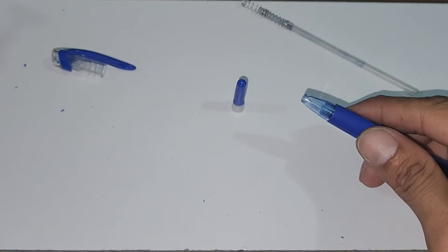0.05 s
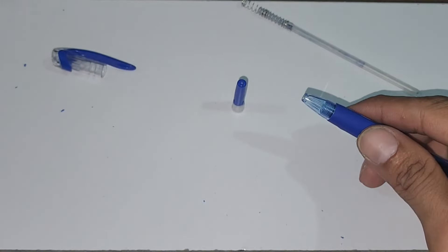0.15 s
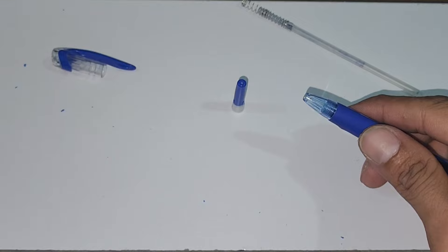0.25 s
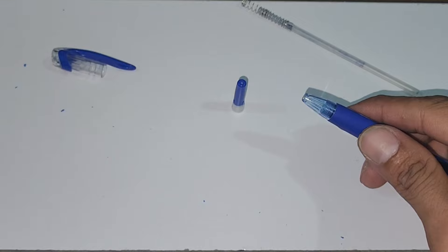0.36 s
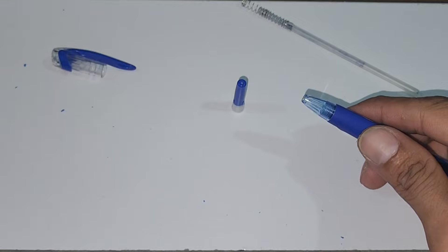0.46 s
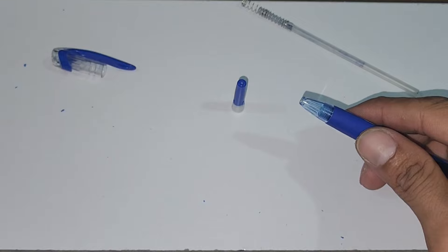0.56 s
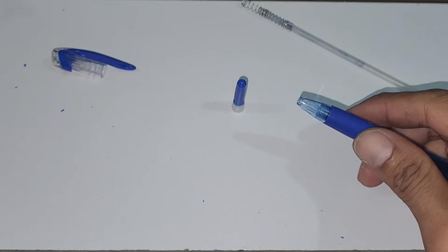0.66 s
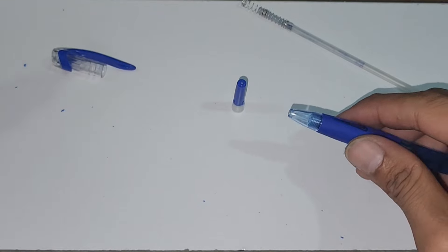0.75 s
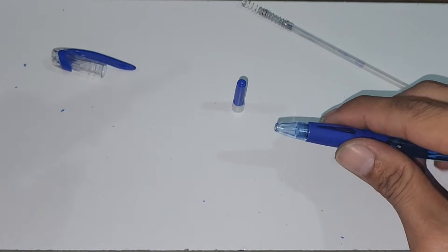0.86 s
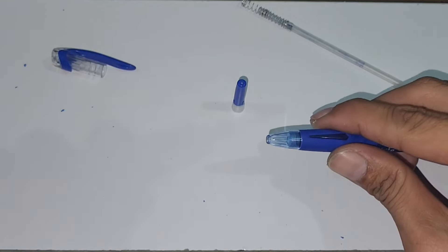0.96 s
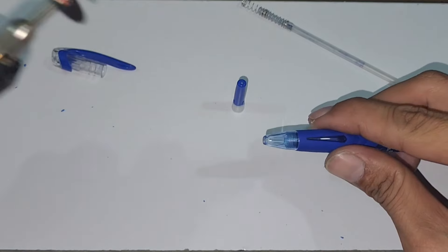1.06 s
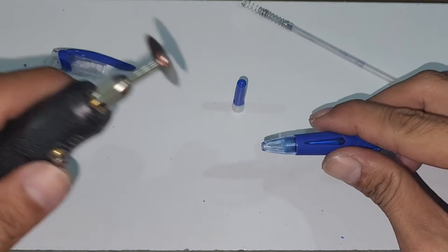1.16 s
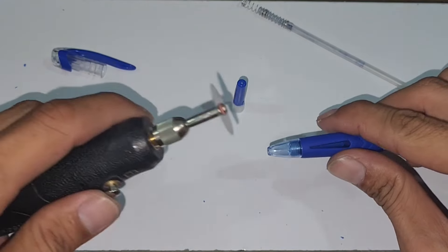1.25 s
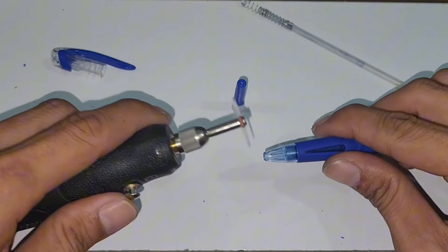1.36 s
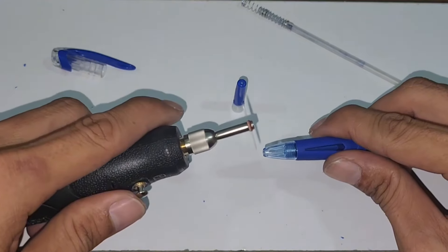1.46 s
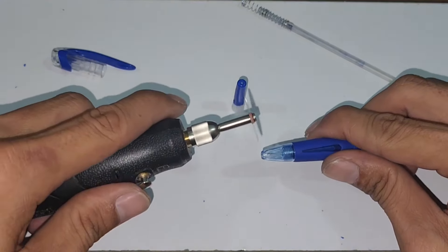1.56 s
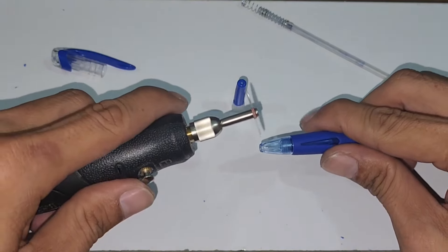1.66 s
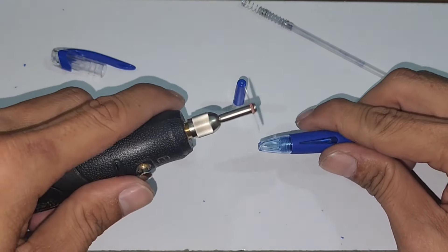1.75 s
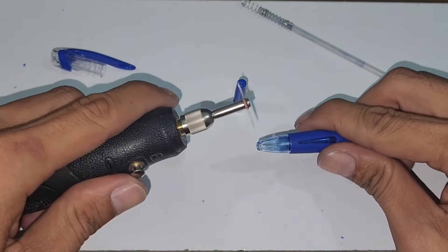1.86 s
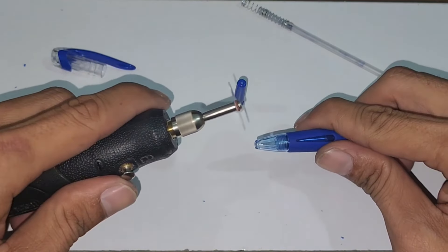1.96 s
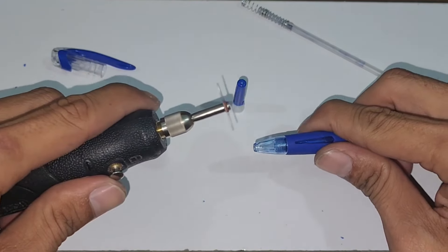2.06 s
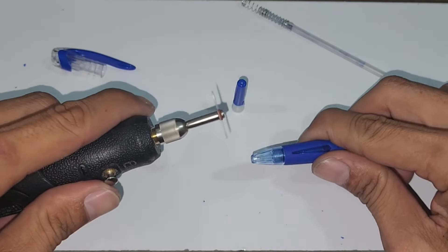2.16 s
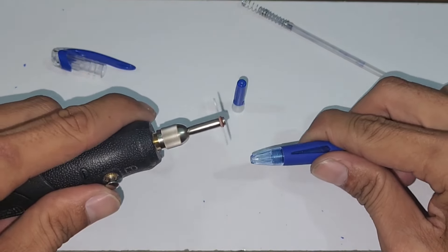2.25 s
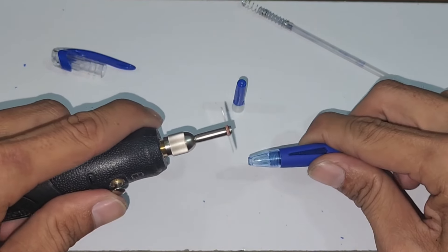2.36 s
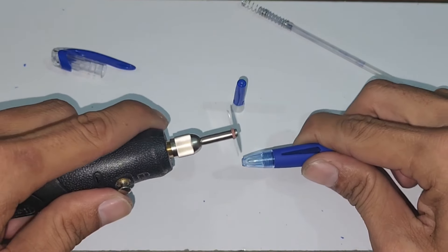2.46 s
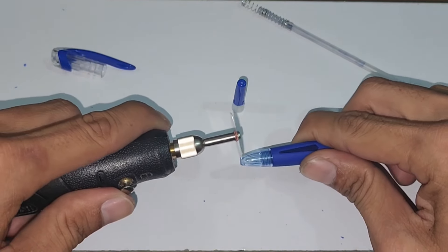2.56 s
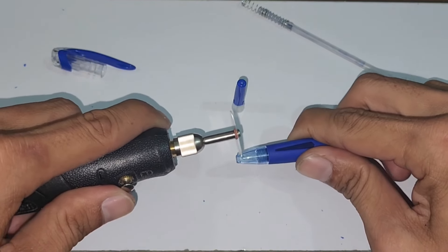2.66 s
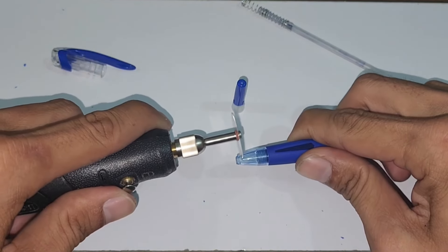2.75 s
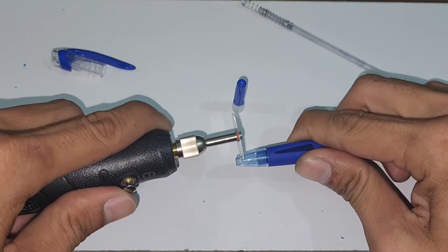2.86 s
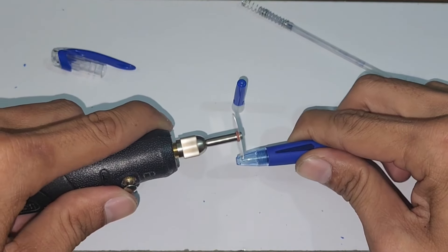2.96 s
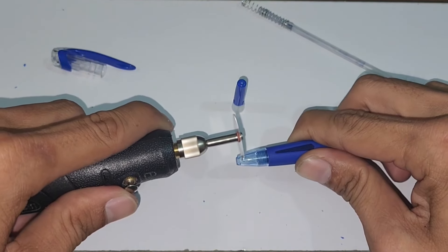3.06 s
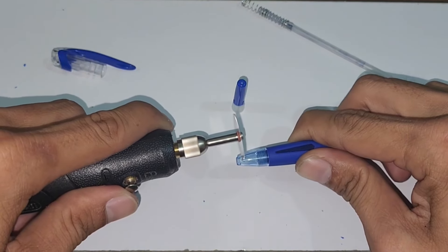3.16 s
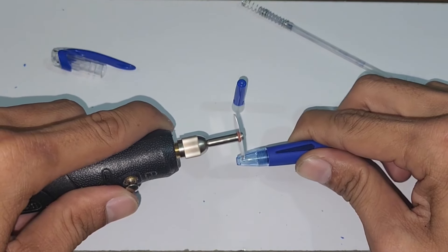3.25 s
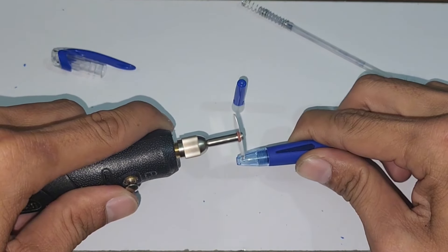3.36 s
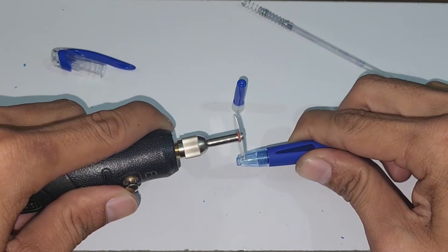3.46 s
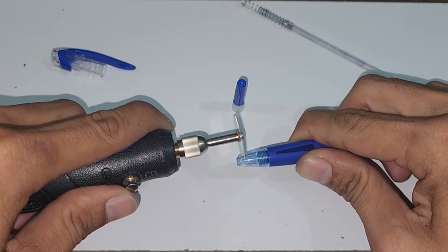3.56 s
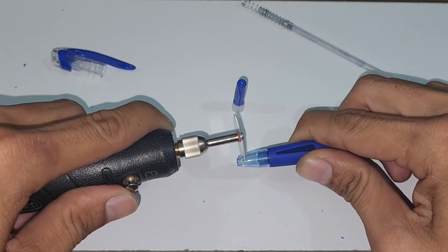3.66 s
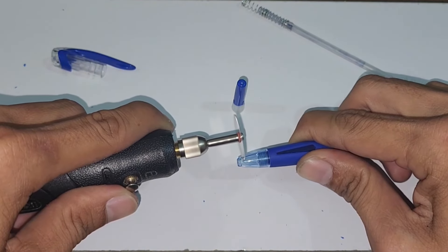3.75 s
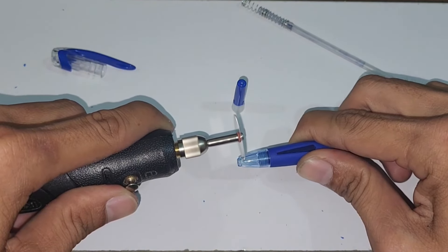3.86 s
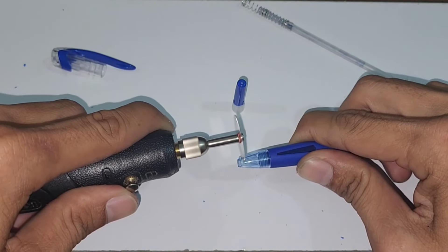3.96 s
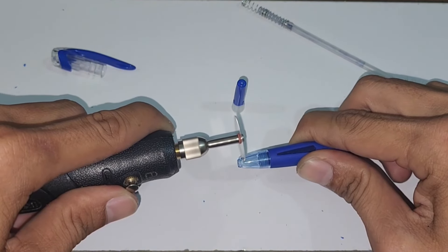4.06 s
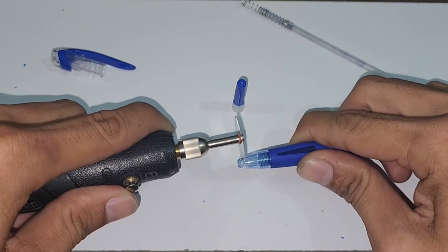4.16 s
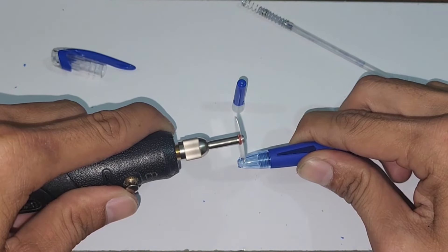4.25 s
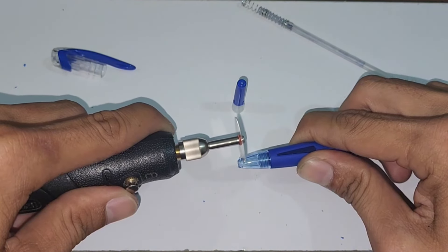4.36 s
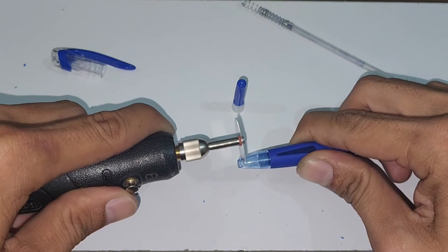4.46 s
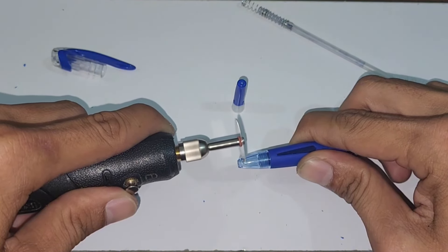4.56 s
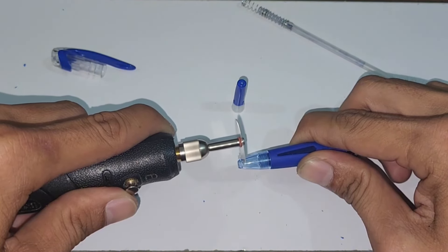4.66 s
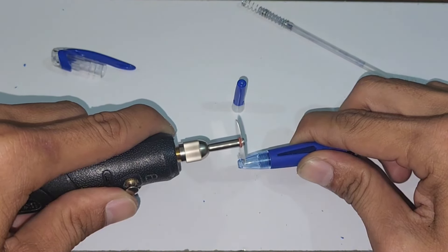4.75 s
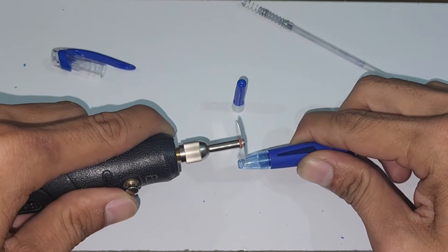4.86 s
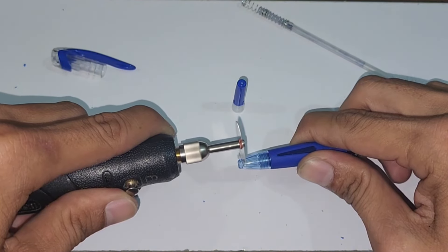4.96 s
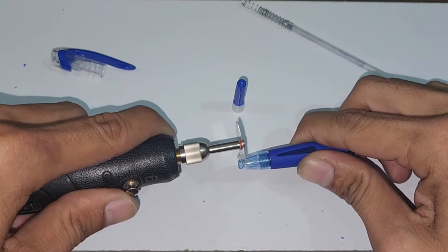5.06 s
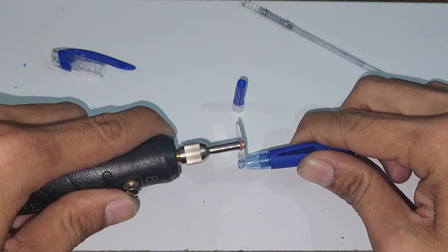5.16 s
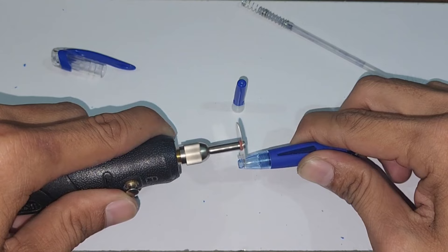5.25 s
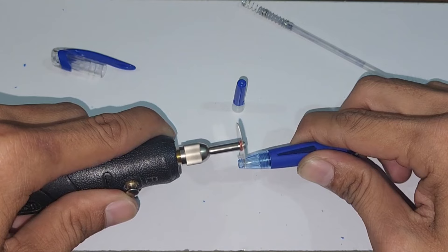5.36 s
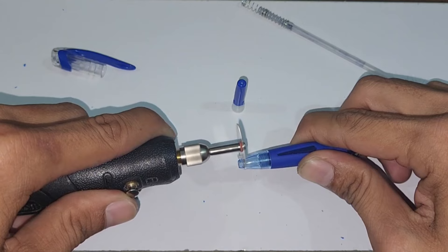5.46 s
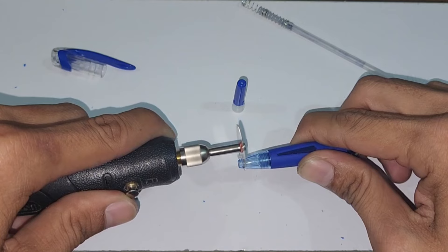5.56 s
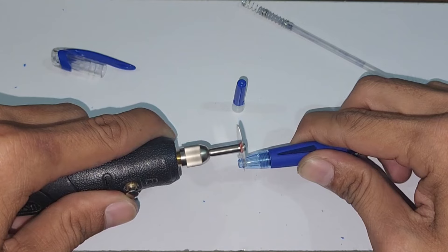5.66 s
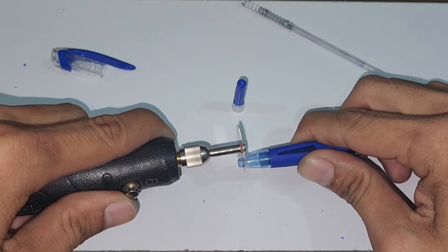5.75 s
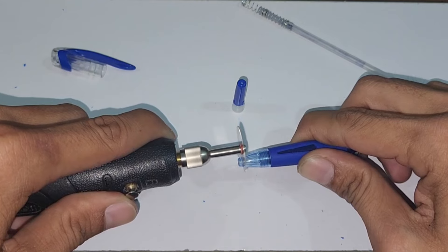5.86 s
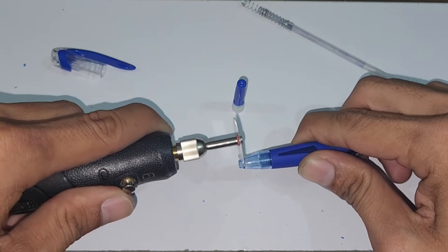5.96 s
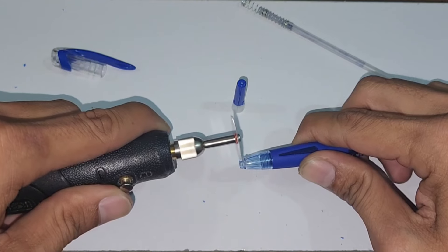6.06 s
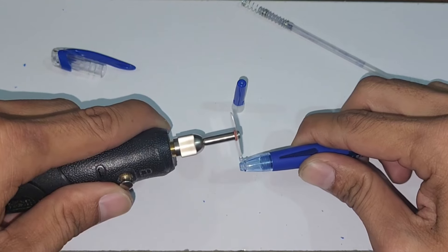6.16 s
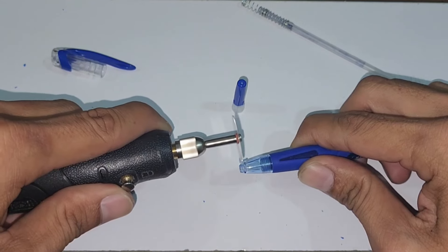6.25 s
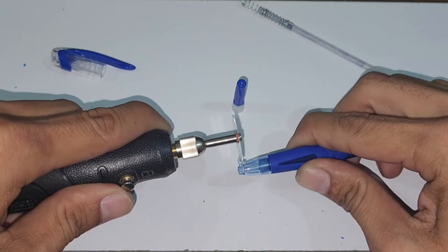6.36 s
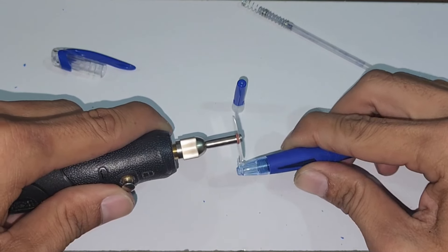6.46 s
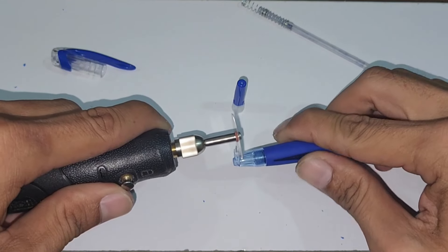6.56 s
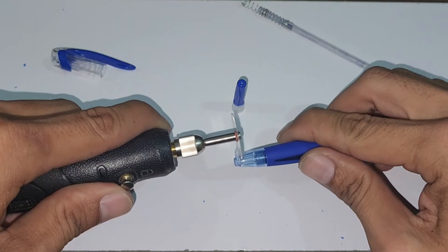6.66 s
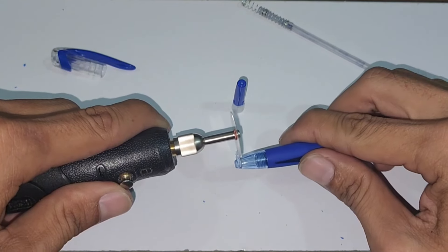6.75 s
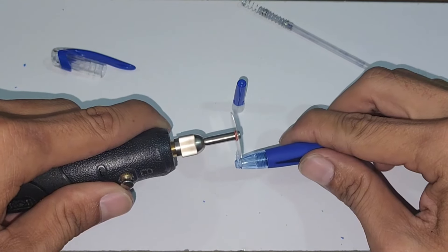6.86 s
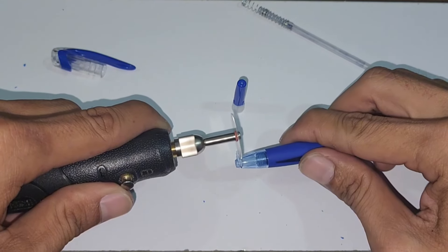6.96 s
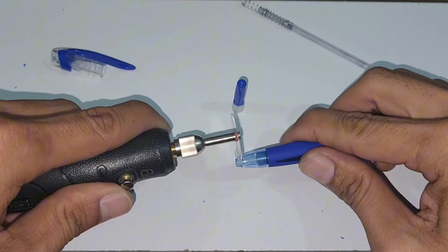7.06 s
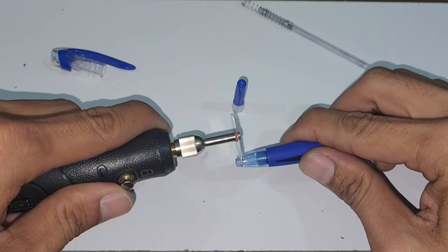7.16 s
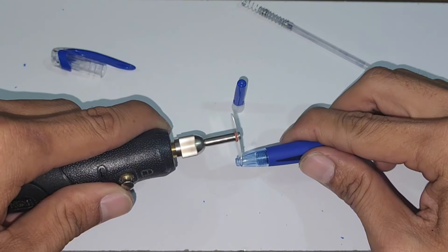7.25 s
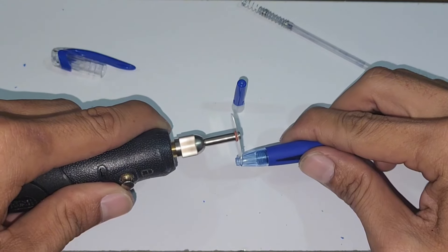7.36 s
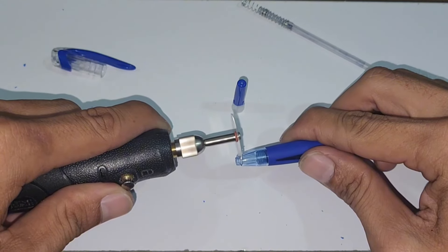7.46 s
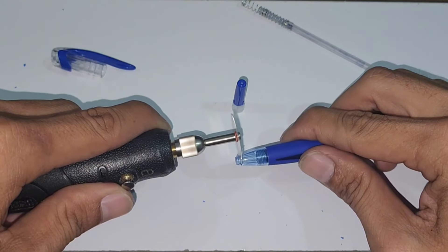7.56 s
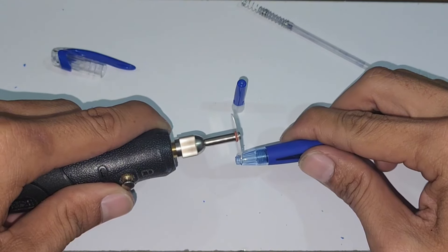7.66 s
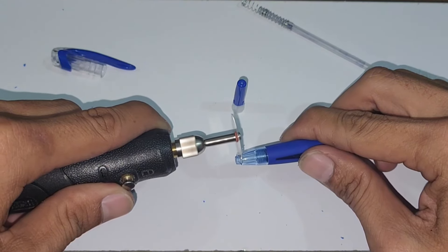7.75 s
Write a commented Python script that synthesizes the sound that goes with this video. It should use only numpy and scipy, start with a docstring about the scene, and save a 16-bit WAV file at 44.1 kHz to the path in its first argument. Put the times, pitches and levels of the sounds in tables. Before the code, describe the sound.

A fan hums faintly in a small room. A switch clicks and a small rotary tool spins up to a buzzy, high whine. Its thin steel disc grazes a plastic pen barrel, then digs in with a gritty rasp and bright metallic ringing. The pitch sags until the motor nearly stalls, squealing. The disc breaks free with a sharp chirp, speeds up again and starts a second cut, all heard close.

```python
"""At a desk in a small room, a fan hums and a rotary tool clicks on to saw a plastic pen barrel.
The motor whines at about 300 turns a second, its brushes buzz and its shaft hums through the desk.
The thin steel disc grazes, digs in and rasps once a turn, ringing itself and the plastic. It binds in
the slot, squeals and nearly stalls, breaks free with a chirp, spins back up and starts a second cut."""
import sys
import numpy as np
from scipy import signal
from scipy.fft import rfft, irfft, next_fast_len
from scipy.io import wavfile
from scipy.ndimage import uniform_filter1d, map_coordinates

SR = 44100
rng = np.random.default_rng(int(sys.argv[2]) if len(sys.argv) > 2 else 0)


def int16_out(signal):
    """Quantize to a 16-bit WAV file."""
    q = np.round(np.clip(np.atleast_2d(signal).T, -1, 1) * 32767)
    wavfile.write(sys.argv[1], SR, q.astype(np.int16))


N = 344421
TIME = np.arange(N) / SR
ON_S, WARM_SPEED = 0.44, 307.5  # the motor starts; all shaft speeds are in turns per second


def amp(db):
    """Decibels to gain."""
    return 10 ** (np.asarray(db) / 20)


def unit(x):
    """Scales to rms 1."""
    return x / np.sqrt(np.mean(abs(x) ** 2) + 1e-20)


def curve(rows, column=1):
    """One column of a table, joined by straight lines in time."""
    return np.interp(TIME, [r[0] for r in rows], [r[column] for r in rows])


def eq_db(points, hz):
    """Reads an EQ curve in dB on a log-frequency axis."""
    f, db = np.transpose(points)
    return np.interp(np.log(hz + 1), np.log(f), db)


def colour(x, response):
    """Filters by a gain given as a function of frequency; rms 1."""
    size = next_fast_len(N + 4096)
    return unit(irfft(rfft(x, size) * response(np.fft.rfftfreq(size, 1 / SR)), size)[..., :N])


def equalise(x, points):
    """Filters by an EQ curve; rms 1."""
    return colour(x, lambda hz: amp(eq_db(points, hz)))


def drift(per_s):
    """Smooth random movement of rms 1 that changes about per_s times a second."""
    hz = np.fft.rfftfreq(8192, 1 / 1000)
    slow = irfft(rfft(rng.standard_normal(8192)) * np.exp(-(hz / per_s) ** 2))
    return np.interp(TIME, np.arange(8192) / 1000, unit(slow))


def stereo_noise(likeness):
    """Two partly alike channels of white noise."""
    left, other = rng.standard_normal((2, N))
    return np.array([left, likeness * left + np.sqrt(1 - likeness ** 2) * other])


def swell(s, length):
    """A bell-shaped rise and fall around time s."""
    return np.exp(-np.pi * ((TIME - s) / length) ** 2) * (abs(TIME - s) < 2 * length)


def pace(speed, power):
    """A gain that falls with the shaft's speed, near 1 when it runs free."""
    return (np.maximum(speed, 1) / WARM_SPEED) ** power * (TIME > ON_S)


def scatter(x, decay_s, wet_db):
    """Desk, hands and walls scatter a sound differently to left and right, keeping its power."""
    t = np.arange(2048) / SR
    taps = amp(wet_db) * rng.standard_normal((2, len(t))) * np.exp(-t / decay_s)
    taps /= np.sqrt(decay_s * SR / 2)
    taps[:, 0] += 1
    heard = signal.oaconvolve(x[None], taps, axes=1)[:, :N]
    return heard * x.std() / heard.std(axis=1, keepdims=True)


# Room tone EQ: (frequency [Hz], relative level [dB])
ROOM_EQ = [(25, -11), (90, -10), (130, -10), (170, -13.5), (260, -17.5), (340, -24.5), (500, -30.5),
           (700, -31.5), (1150, -39.5), (1650, -33), (2400, -50), (7500, -51.5), (9500, -71), (15000, -52)]
# The fan's tones: (frequency [Hz], level [dB])
FAN_TONES = [(88, -61.5), (128, -60), (200, -68)]


def room_tone():
    """A bed of low room rumble and the wavering hum of a fan."""
    rumble = amp(-57.5) * equalise(stereo_noise(0.73), ROOM_EQ)
    fan = sum(amp(db) * np.sin(2 * np.pi * hz * TIME + 0.31 * drift(16)) for hz, db in FAN_TONES)
    return rumble + np.sqrt(2) * fan


# The switch and the fingers on it: (time [s], peak level [dB], decay [s])
SWITCH_CLICKS = [(0.049, -64.5, 0.014), (0.379, -51, 0.0049), (0.452, -40, 0.022), (0.468, -33.5, 0.0042)]


def switch():
    """Short, bright snaps of the switch; the longer ones also have a softer attack."""
    envelope = sum(amp(db) * np.exp(-abs(TIME - s) / np.where(TIME < s, decay * 0.22, decay))
                   for s, db, decay in SWITCH_CLICKS)
    snap_eq = [(400, -26), (2000, -8), (4000, 9), (9000, 0.5), (14500, 4)]
    return envelope * equalise(stereo_noise(0.15), snap_eq)


# The shaft's pitch dive at each contact with the barrel: (time [s], speed [turns/s])
GRAZE = [(3.2, 304.7), (3.53, 303.3)]
FIRST_CUT = [(3.78, 305), (4.05, 293.5), (4.35, 272.5), (4.43, 261), (4.53, 257.4), (4.69, 270),
             (4.84, 266), (5.05, 269.5), (5.33, 263.5), (5.54, 251.5), (5.7, 224), (5.8, 180), (5.89, 119),
             (5.957, 116)]
NICK = [(6.54, 306), (6.645, 287)]
SECOND_CUT = [(6.97, 306.6), (7.08, 303.8), (7.34, 303.4), (7.42, 295), (7.81, 277.3)]


def shaft(cold_loss=7.5, warm_up_s=3.3, spin_up_s=0.058, let_go_s=0.016):
    """Speed and drag (speed lost to the cut): each contact holds the shaft back, then it recovers."""
    def lag(s):
        return np.exp(-(np.maximum(TIME - s, 0) / spin_up_s) ** 1.2)

    free = WARM_SPEED - cold_loss * np.exp(-TIME / warm_up_s)  # the motor gains speed as it warms
    speed, drag = free * (1 - lag(ON_S)), 0
    for contact in (GRAZE, FIRST_CUT, NICK, SECOND_CUT):
        start, end = contact[0][0], contact[-1][0]
        lost = np.maximum(free - curve(contact), 0) * (TIME > start)
        speed = speed - lost * lag(end)
        drag = drag + lost * np.exp(-np.clip((TIME - end) / let_go_s, 0, 20))
    return speed, drag


# The hand lifts off the desk: (start [s], end [s], level change [dB])
HAND_LIFTS = [(0.4, 1.753, -10), (1.184, 1.42, -14), (1.93, 2.137, -4.5), (6.004, 6.31, -15),
              (6.39, 6.76, -2.5)]


def lift_db():
    """A lifted hand passes less of the motor's low end to the desk."""
    return uniform_filter1d(sum(db * ((TIME > a) & (TIME < b)) for a, b, db in HAND_LIFTS), 900)


# Harmonics of the shaft: (harmonic [number], level relative to the whine [dB])
WHINE_HARMONICS = [(2, -21), (3, -15), (4, -15), (6, -11), (7, -7), (8, -20), (9, -20), (10, -9), (11, -17),
                   (12, -7), (13, -12), (14, -16), (16, -9), (17, -14), (18, -6), (19, -21), (20, -23),
                   (21, -16), (22, -15), (23, -13), (24, -14)]
# EQ of the buzzy top harmonics: (frequency [Hz], level relative to the whine [dB])
BUZZ_EQ = [(7500, -20), (8200, -19), (9000, -23), (9800, -15), (10300, -9.5), (11000, -8), (11800, -26),
           (13500, -17), (15600, -16.5)]
# Fader rides as the hands move the motor:
# (time [s], whine level [dB], brush level [dB], shrill 15th harmonic level [dB])
MOTOR_FADERS = [(0.55, -48, -45, -43), (0.67, -46, -45, -39), (0.88, -40.5, -43.5, -44.5),
                (1.25, -42, -36, -37.5), (1.9, -41, -42, -31.5), (2.55, -39.5, -44.5, -43.5),
                (3.1, -41.5, -43, -43), (3.85, -41.5, -45, -39), (5.5, -34, -36, -36),
                (6.02, -43, -39, -36), (6.12, -46, -39, -36), (6.9, -42.5, -41.5, -37),
                (7.8, -42, -43, -35.5)]


def whine(speed, turns, touch, grip, sway_per_s=1.78, flutter_per_s=30, hop=128):
    """Shaft harmonics sway in stereo as the hands move, and flutter harder on contact."""
    whine_db = curve(MOTOR_FADERS)[::hop]
    levels = {k: whine_db + eq_db(BUZZ_EQ, k * speed[::hop]) for k in range(25, 53)}
    levels.update({round(k): whine_db + db for k, db in WHINE_HARMONICS})
    levels[5] = whine_db - 2 - 4 * grip[::hop]
    levels[15] = (curve(MOTOR_FADERS, column=3) - grip)[::hop]
    desk_db = 2 + 0.4 * lift_db()[::hop]
    for k in range(2, 6):  # the desk carries the lowest harmonics
        levels[k] += desk_db
    rates = np.fft.fftfreq(len(whine_db), hop / SR)
    out = np.zeros((2, N))
    for k in range(2, 53):
        noise = rng.standard_normal((3, len(rates))) + 1j * rng.standard_normal((3, len(rates)))
        sway = unit(np.fft.ifft(noise[:2] * np.exp(-(rates / sway_per_s) ** 2)))
        flutter = unit(np.fft.ifft(noise[2] * np.exp(-(rates / flutter_per_s) ** 2)))
        sway_depth = 0.71 / 3 if k in (5, 15) else 0.71
        flutter_depth = (0.28 + 0.65 * touch[::hop]) * np.sqrt(k / 10)
        phase_spread = np.array([[1], [-1]]) * (np.pi / 4 + 0.51 * sway[0].imag)
        path = np.exp(1j * (2 * np.pi * rng.random() + phase_spread * rng.choice([-1, 1])))
        path *= (1 + sway_depth * sway) / np.hypot(1, sway_depth)
        path *= (1 + flutter_depth * flutter) / np.hypot(1, flutter_depth)
        gain = np.array([np.interp(TIME, TIME[::hop], side) for side in path * amp(levels[k])])
        out += (gain * np.exp(2j * np.pi * k * turns)).real
    return np.sqrt(2) * out * pace(speed, 10.5) * amp([[0.8], [-0.8]])


def scrape(speed, turns, memory_turns, fresh, wobble, uneven_db, steady_speed=255):
    """The same surfaces meet each turn, so the rasp repeats as they wear; at low speed it breaks up."""
    spots_per_turn = 144
    wear = np.exp(-0.5 * (np.arange(-20, 21) / memory_turns) ** 2)
    track = signal.fftconvolve(rng.standard_normal((2400, spots_per_turn)), wear[:, None], "same", axes=0)
    repeating = unit(map_coordinates(track.ravel(), [turns * spots_per_turn], order=3, mode="wrap"))
    runout = np.exp(wobble * np.cos(2 * np.pi * turns))  # the shaft runs out of true
    pressure = runout * amp(uneven_db * drift(210))
    loose = np.clip(fresh + np.maximum(steady_speed - speed, 0) / 90, 0, 1)
    return pressure * (np.sqrt(1 - loose ** 2) * repeating + loose * rng.standard_normal(N))


# EQ of the brushes on the commutator: (frequency [Hz], relative level [dB])
BRUSH_EQ = [(300, -7), (900, -3), (1500, 6.5), (2600, 0), (4300, 8), (6000, 0.5), (9000, -12), (12500, 3),
            (15700, -24)]


def brushes(speed, turns, spark_db=-43, spark_fade_s=1.23):
    """Brushes scrape the commutator bars: a fine buzz, with a fizz of sparks that fades after the start."""
    friction = scrape(speed, turns, memory_turns=7, fresh=0.2, wobble=0.4, uneven_db=0.8)
    buzz = amp(curve(MOTOR_FADERS, column=2)) * equalise(friction, BRUSH_EQ)
    buzz = scatter(buzz, decay_s=0.0036, wet_db=6.5)
    sparks = stereo_noise(0.1) * np.exp(0.84 * np.cos(2 * np.pi * turns))
    fizz = equalise(sparks, [(900, -6), (2000, 15.5), (8000, 8.5), (13500, 19.5)])
    fade = np.exp(-((TIME - ON_S) / spark_fade_s) ** 2)
    return pace(speed, 0.71) * buzz + amp(spark_db) * pace(speed, 2.1) * fade * fizz


def shaken(modes, speed, turns, harmonic):
    """One shaft harmonic, which swells as it sweeps through each resonance."""
    gain = sum(amp(db) / (1 + (2 * (harmonic * speed - hz) / width) ** 2) ** 0.8
               for hz, width, db in modes)
    return gain * np.sqrt(2) * np.sin(2 * np.pi * harmonic * turns)


# Resonances of the desk: (frequency [Hz], width [Hz], level [dB])
DESK_MODES = [(123, 13, -46), (194.5, 19, -39.5), (267, 22, -58), (303.5, 31, -43), (601, 330, -55)]


def shaft_hum(speed, turns, touch, grip, bind, waver_db=2.4):
    """The shaft's imbalance hums through air and desk; a gripping disc also wobbles twice a turn."""
    drive = amp(lift_db() + waver_db * touch * drift(35)) * np.maximum(pace(speed, 4.7), bind)
    desk = drive * shaken(DESK_MODES, speed, turns, harmonic=1) * amp([[1.8], [-2.0]])
    air = amp(-51) * pace(speed, 13) * np.cos(2 * np.pi * turns) * np.array([[1], [-1]])
    wobble = amp(waver_db * drift(41) - 1) * grip * shaken(DESK_MODES, speed, turns, harmonic=2)
    return desk + air + wobble


# Accents where the teeth catch and bite harder: (time [s], peak level [dB])
TOOTH_BITES = [(3.237, -33.5), (3.299, -28), (3.398, -33), (3.457, -32), (3.525, -26), (3.794, -28.5),
               (3.847, -21.5), (3.877, -24.5), (3.925, -29), (4.01, -29), (4.601, -24), (4.739, -15),
               (5.202, -23), (5.353, -22), (6.562, -31.5), (6.585, -34), (6.635, -35), (6.949, -36.5),
               (7.053, -38), (7.299, -24.5), (7.355, -18), (7.521, -23.5), (7.667, -48), (7.79, -46)]


def cutting(speed, turns, grip, bite_s=0.021, chatter_hz=13.3):
    """The chattering teeth set steel and plastic sounding, louder with grip and at each bite."""
    bites = np.sqrt(sum((amp(db) * swell(s, bite_s)) ** 2 for s, db in TOOTH_BITES))
    catch = np.minimum(bites / amp(-34), 1)  # the soft plastic gives way before the steel does
    chatter = amp(4 * np.sin(2 * np.pi * chatter_hz * TIME + 1.8 * drift(15)))
    steel = disc_ring(speed, turns, grip, bites, chatter)
    plastic = barrel_rasp(speed, turns, grip, catch, chatter)
    return steel + plastic + barrel_knock(speed, turns, grip, catch)


# Resonances of the steel disc: (frequency [Hz], width [Hz], relative level [dB])
DISC_MODES = [(11000, 260, -7), (11345, 130, 4), (12410, 190, 0), (12750, 320, -2), (13380, 200, -3),
              (13610, 150, -6), (14700, 500, -13), (15480, 450, -7)]


def disc_ring(speed, turns, grip, bites, chatter, break_free_s=5.991):
    """The scrape rings the steel disc, with a bright accent as it breaks free of the slot."""
    def steel(hz):
        modes = sum(amp(db) / (1 + 2j * (hz - f) / width) for f, width, db in DISC_MODES)
        return modes / (1 + (9800 / (hz + 1)) ** 12)  # steep low cut

    sustain = amp(-20) * grip ** 1.23 * pace(speed, 2.06) * chatter  # slow teeth hardly ring the steel
    release = amp(-13) * swell(break_free_s, 0.028)
    envelope = np.sqrt(sustain ** 2 + bites ** 2 + release ** 2)
    friction = scrape(speed, turns, memory_turns=11.3, fresh=0.58, wobble=0.86, uneven_db=0)
    return scatter(envelope * colour(friction, steel), decay_s=0.005, wet_db=8)


# EQ of the sawn plastic: (frequency [Hz], relative level [dB])
PLASTIC_EQ = [(200, -16.5), (520, -12), (780, -33), (1000, 0), (1200, -9.5), (1900, 9), (2700, 0.5),
              (3600, 2), (4800, 7), (5800, 0.5), (7200, 8.5), (9500, -0.5), (12000, -16.5), (15700, 6)]


def barrel_rasp(speed, turns, grip, catch, chatter):
    """The teeth gouge the plastic barrel: a gritty rasp that pulses once a turn."""
    sustain = amp(-28) * grip * pace(speed, 0.82) * chatter ** 0.35
    envelope = np.hypot(sustain, amp(-34) * catch)
    gouges = scrape(speed, turns, memory_turns=2.8, fresh=0.12, wobble=0.6, uneven_db=1.4)
    return scatter(envelope * equalise(gouges, PLASTIC_EQ), decay_s=0.0049, wet_db=7)


# Resonances of the pen barrel: (frequency [Hz], width [Hz], level [dB])
BARREL_MODES = [(1198, 150, -44.5), (1790, 200, -54)]


def barrel_knock(speed, turns, grip, catch):
    """The disc knocks the barrel every turn, giving the cut a hollow midrange body."""
    body = sum(amp(3 * drift(16)) * shaken(BARREL_MODES, speed, turns, k) for k in range(4, 8))
    return (amp(-1) * grip * pace(speed, 5.9) + amp(-4) * catch) * body


# Squeaks of the slot: (time [s], length [s], level [dB], harmonic [number])
SLOT_SQUEAKS = [(5.31, 0.24, -40.5, 5), (6.614, 0.06, -37.5, 7)]


def slot_squeaks(turns):
    """The slot squeaks briefly on a single shaft harmonic."""
    return sum(amp(db) * swell(s, length) * unit(np.sin(2 * np.pi * round(k) * turns))
               for s, length, db, k in SLOT_SQUEAKS)


# Flares of the squeal, the last and loudest as the disc breaks free: (time [s], length [s], level [dB])
SQUEAL_FLARES = [(5.71, 0.036, -40), (5.877, 0.028, -31.5), (5.989, 0.02, -17.5)]


def squeal(speed, bind, teeth=60, jitter=0.05):
    """Teeth tick unsteadily through the binding slot: a fuzzy whistle whose pitch follows the shaft."""
    hz = teeth * speed * (1 + jitter * unit(uniform_filter1d(rng.standard_normal(N), 14)))
    whistle = np.sin(2 * np.pi * np.cumsum(hz) / SR) * amp(2 * drift(320))
    envelope = amp(-35) * bind + sum(amp(db) * swell(s, length) for s, length, db in SQUEAL_FLARES)
    return scatter(envelope * unit(whistle), decay_s=0.003, wet_db=-2)


def hand_sway(x, lag_s=7e-5):
    """As the hands move, the path to the right channel grows and shrinks."""
    right = map_coordinates(x[1], [(TIME - lag_s * drift(1)) * SR], order=3, mode="nearest")
    return np.array([x[0], right])


def walls(x, t60_s=0.3, wet_db=-12):
    """The small room's short, bright reverb tail, different on each side."""
    t = np.arange(SR // 2) / SR
    tail = rng.standard_normal((2, len(t))) * amp(-60 * t / t60_s) * (t > 0.006)
    tail = signal.sosfilt(signal.butter(2, 800, "high", fs=SR, output="sos"), tail)
    return x + amp(wet_db) * signal.oaconvolve(x, tail / np.linalg.norm(tail[0]), axes=1)[:, :N]


def scene():
    """One shaft drives motor and cut; the drag on it sets how hard the disc rasps, rings and squeals."""
    speed, drag = shaft()
    # three depths of contact, each from 0 to 1
    touch = np.tanh(drag / 0.37)
    grip = np.tanh(drag / 33.65)
    bind = np.tanh((drag / 48) ** 3)
    speed = speed * (1 + (0.00092 + 0.00363 * grip) * drift(39))  # the pitch wavers more under load
    turns = np.cumsum(speed) / SR
    judder = amp((0.4 + 1.2 * touch) * drift(16))
    grit = switch() + brushes(speed, turns) + cutting(speed, turns, grip)
    squeaks = slot_squeaks(turns) + squeal(speed, bind)
    motor = judder * whine(speed, turns, touch, grip) + shaft_hum(speed, turns, touch, grip, bind)
    return room_tone() + motor + walls(hand_sway(grit + squeaks))


def record(dry, cutoff_hz=15760):
    """A steep high cut on the whole mix."""
    high_cut = signal.firwin(1023, cutoff_hz, window=("kaiser", 9), fs=SR)
    return signal.oaconvolve(dry, high_cut[None], "same")


dry = scene()
out = record(dry)
int16_out(out)
```